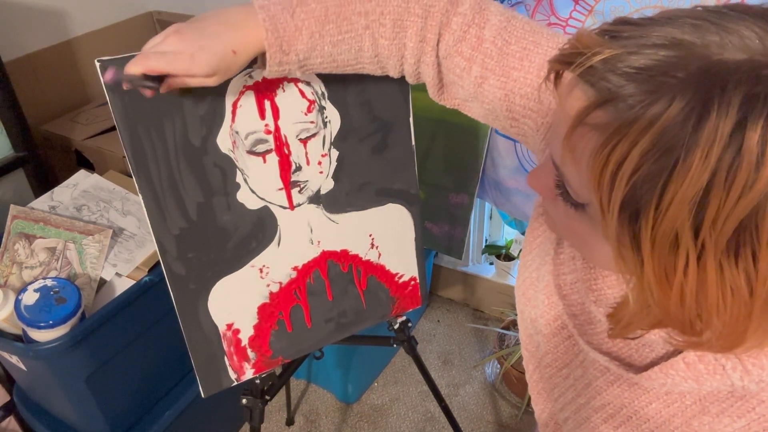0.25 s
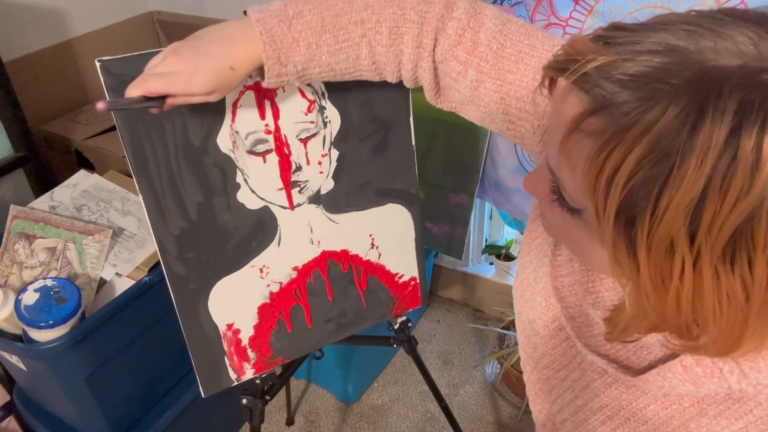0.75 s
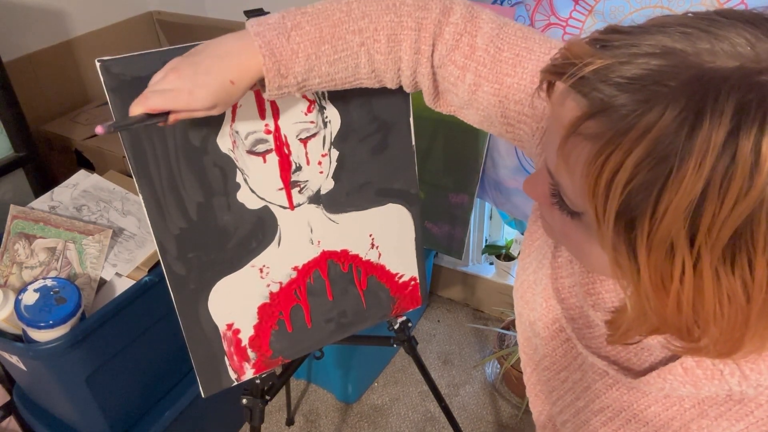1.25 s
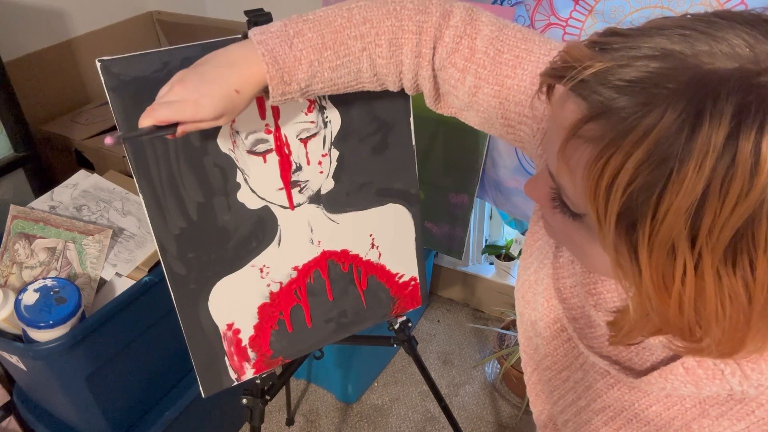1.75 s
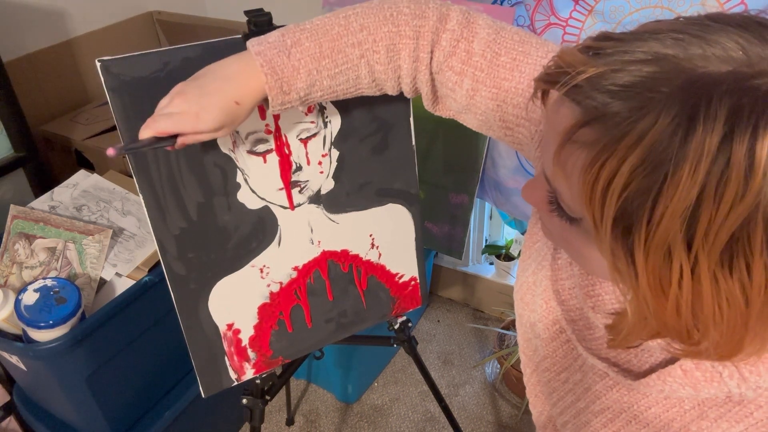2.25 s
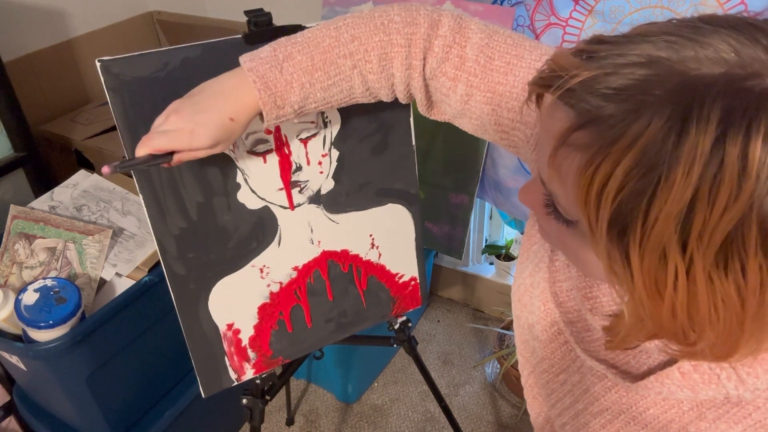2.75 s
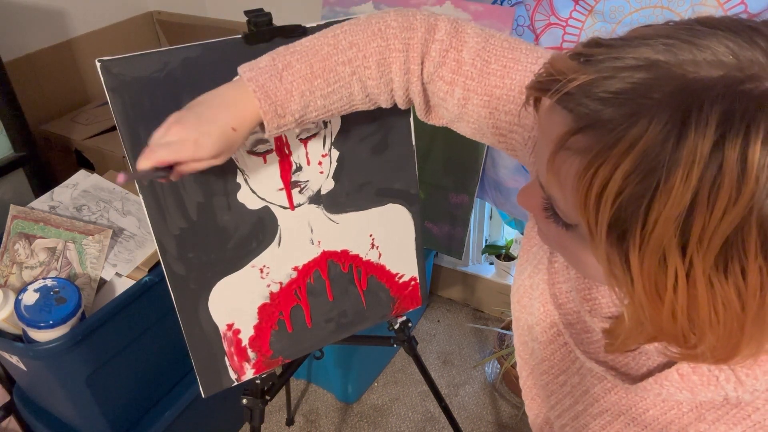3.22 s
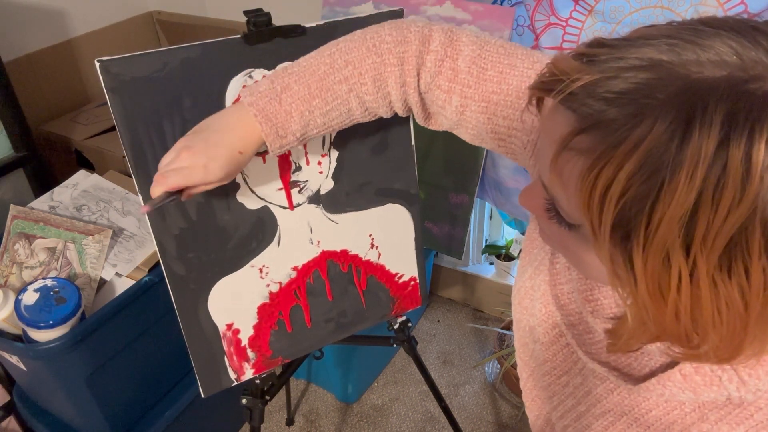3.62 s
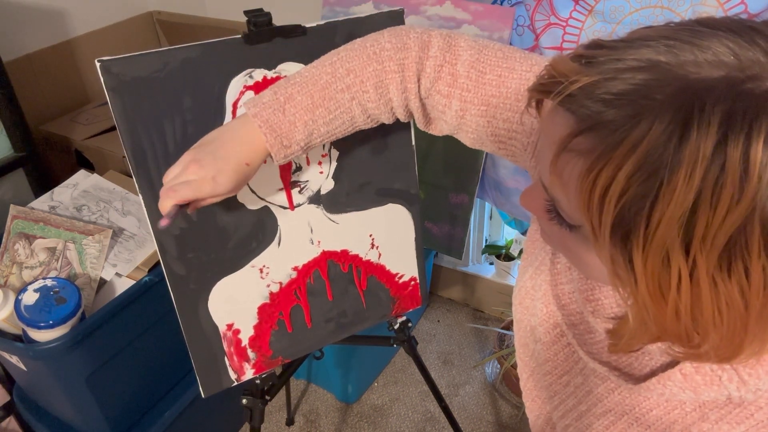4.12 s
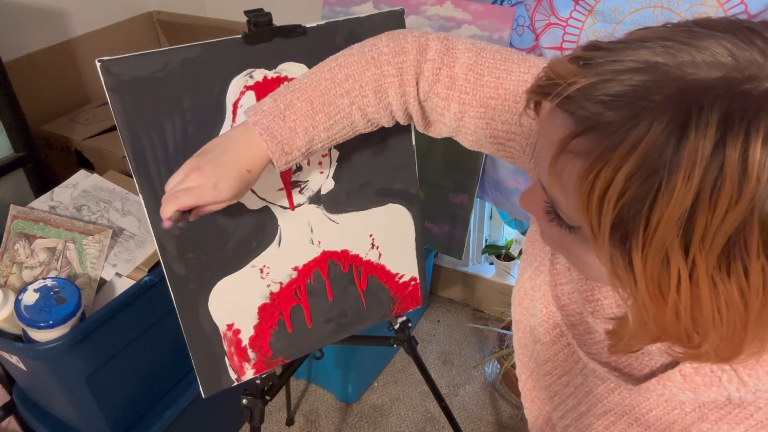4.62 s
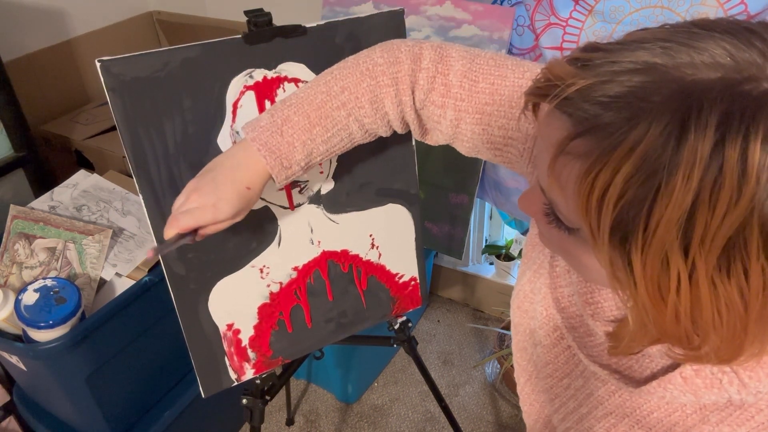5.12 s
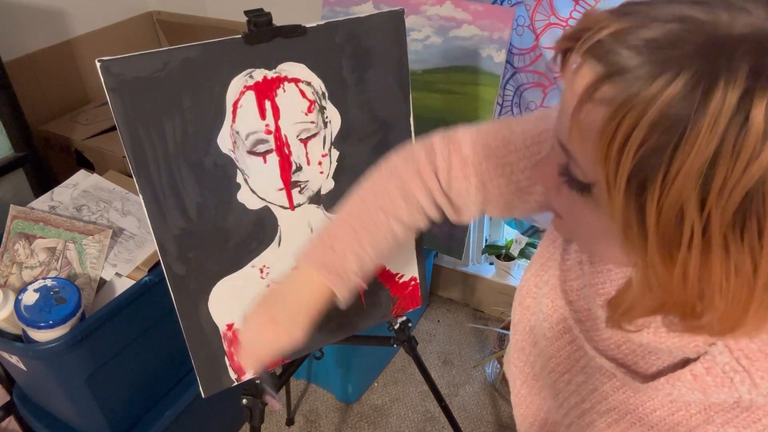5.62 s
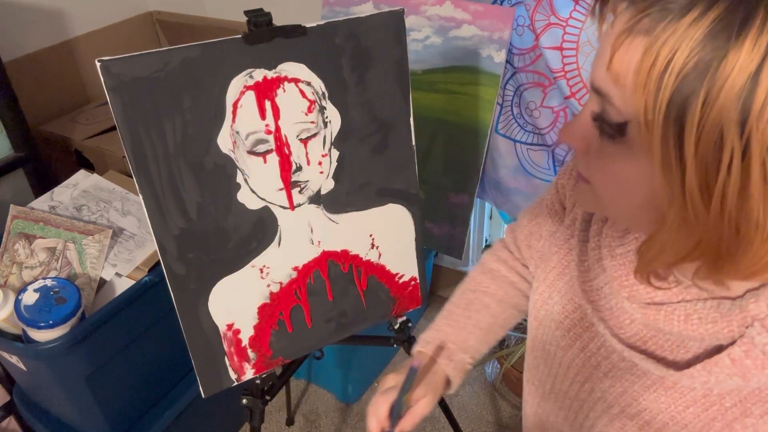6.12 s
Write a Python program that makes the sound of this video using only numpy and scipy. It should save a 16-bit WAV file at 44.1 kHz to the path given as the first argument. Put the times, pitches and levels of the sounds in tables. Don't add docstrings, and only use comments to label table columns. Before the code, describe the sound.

Close, quiet painting sounds: short bristly swishes and dull dabs on taut cloth, small wooden creaks, and a muffled engine slowing to idle beyond the wall.

```python
import sys
import numpy as np
from scipy import signal
from scipy.fft import rfft, irfft
from scipy.io import wavfile

SR = 44100
rng = np.random.default_rng(int(sys.argv[2]) if len(sys.argv) > 2 else 0)


def invert_db(x):
    u = np.asarray(x, float) / 20
    return 10 ** u


def bounce(signal):
    frames = np.transpose(np.atleast_2d(signal))
    limited = np.clip(frames, -1, 1)
    pcm = np.round(limited * 32767).astype(np.int16)
    wavfile.write(sys.argv[1], SR, pcm)


N = 280917

# centre [Hz], width [Hz], level [dB].
CLOTH_RESONANCES = [(1260, 196, 1), (1650, 223, 2.5), (2260, 840, -1.5), (3010, 82, 4), (3500, 670, -4.5),
                    (4530, 1400, -36.5)]
# centre [Hz], width [Hz], level [dB].
FRAME_RESONANCES = [(304.8, 28, 7), (345.2, 30, 6), (430, 28, -3.5), (523, 108, -3.5), (760, 230, -5),
                    (957, 250, -6.5)]
# centre [Hz], width [Hz], level [dB].
THUD_RESONANCES = [(169, 45, 1), (223.7, 17.1, 4.5), (391, 65, 0)]
# time [s], swell [dB], left minus right [dB].
TRAFFIC = [
    (0.0, -15.5, -2),
    (1.29, -4.5, -0.5),
    (1.88, -6, 1),
    (2.04, -9.5, 0.5),
    (4.17, 1.5, 1.5),
    (4.59, -4.5, -4),
    (4.77, -3.5, 1),
    (6.37, -7.5, -0.5),
]
PORT_LAG = 4.3
CANVAS_PAN_DB = -2.2
REFLECTED = 0.4


def brush():
    # frequency [Hz], spectrum level [dB per Hz].
    bristle_spectrum = [(900, -43), (1800, -16), (3000, -7.5), (3700, 1), (4800, 6), (5800, 4.5),
                        (8100, 4.5), (9500, 0), (10300, -9), (11500, -25.5), (14300, -9), (15600, -17),
                        (16000, -51), (20000, -70)]
    tuft_edges = [2600, 3400, 4400, 5600, 7000, 8600]
    firm_db, brightens = -65, 0.44
    dab_cut_hz = 5500
    hiss, *stroked = strokes()
    scuff, *dabbed = dabs()
    cloth, frame, thud = np.array(stroked) + dabbed
    bands = list(zip(tuft_edges, tuft_edges[1:]))
    tufts = [invert_db(1.6 * drift(5.2)) - 1 for _ in bands]
    angle = invert_db(2.0 * drift(8.1)) * (hiss / invert_db(firm_db) + 1e-9) ** brightens

    def voice(slips):
        bright = colour(slips, bristle_spectrum)
        dull = muffle(muffle(bright, dab_cut_hz), dab_cut_hz)
        for band, catch in zip(bands, tufts):
            sos = signal.butter(1, band, "band", fs=SR, output="sos")
            bright = bright + catch * signal.sosfiltfilt(sos, bright)
        treble = bright - muffle(bright, 5500)
        bright = bright + treble * (angle - 1)
        soft = muffle(slips, 1300)
        surface = hiss * bright + scuff * dull + cloth * body(slips, CLOTH_RESONANCES)
        return surface + frame * body(soft, FRAME_RESONANCES) + thud * body(soft, THUD_RESONANCES)

    near = voice(grains(6000, 2.56))
    apart = voice(grains(6000, 3.2))
    return ports(near, apart, REFLECTED, PORT_LAG, CANVAS_PAN_DB)


def strokes():
    # time of most pressure [s], bristle hiss [dB], rise [s], fall [s],
    # cloth drumming relative to the hiss [dB].
    stroke_rows = [(0.236, -63, 0.073, 0.071, -8), (0.786, -67, 0.078, 0.062, -5.5),
                   (1.337, -66, 0.061, 0.057, -6.5), (1.932, -65.5, 0.076, .055, -6),
                   (2.48, -66, 0.059, 0.093, -7), (3.015, -70.5, 0.11, 0.095, -8.5),
                   (3.072, -72, .04, 0.052, -4), (3.608, -67, 0.06, 0.091, -6),
                   (4.072, -65.5, 0.059, 0.077, -8), (4.552, -68.5, 0.082, 0.071, -9.5),
                   (4.972, -67, 0.068, 0.067, -9.5), (5.272, -76.5, 0.029, 0.066, -0.5),
                   (5.326, -68.5, 0.029, 0.083, -9), (6.34, -73.5, 0.067, 0.097, -7.5)]
    edge_db, shoulder = -15.5, 2.04
    push_db, push_follows = -8, 0.6
    t = np.arange(N) / SR
    hiss, cloth, frame = 0, 0, 0
    for s, peak_db, rise, fall, cloth_db in stroke_rows:
        away = np.where(t < s, (s - t) / rise, (t - s) / fall)
        swell_db = edge_db * np.minimum(away, 8) ** shoulder
        hiss = hiss + invert_db(peak_db + swell_db)
        cloth = cloth + invert_db(peak_db + cloth_db + swell_db)
        frame = frame + invert_db(peak_db + push_db + push_follows * swell_db)
    wavers = [(1.0, 45), (1.5, 13), (2.5, 30), (3.0, 19)]
    waver = [invert_db(swing_db * drift(rate)) for swing_db, rate in wavers]
    return hiss * waver[0], cloth * waver[1], frame * waver[2], frame * waver[3]


def dabs():
    # start [s], peak [dB], upper part relative [dB], thud relative [dB], length [s].
    dab_rows = [(0.059, -71, -4, -9, 0.016), (0.582, -64, -13, -5, 0.021), (1.205, -79, -6, 4, 0.059),
                (1.633, -72.5, -4, -19, 0.031), (1.658, -73.5, -11, 6, 0.031),
                (2.177, -80.5, -1, -6, 0.044), (2.252, -68, -11.5, -10, 0.043), (2.72, -60, -5, -16, 0.016),
                (2.732, -58.5, -13, -12, 0.0075), (2.744, -67, -5, -3, 0.029),
                (2.767, -68.5, -17, 3, 0.023), (3.256, -85, -15, -5, 0.018), (3.911, -58, -9, -11, 0.013),
                (4.392, -79, 1.5, -13, 0.022), (4.835, -71.5, -11, 6.5, 0.017),
                (5.058, -81.5, 3.5, 11, 0.013), (5.098, -79, -1, 19.5, 0.0091), (5.201, -71, -9, -3, 0.018),
                (5.232, -68, -13, 9, 0.01), (4.688, -76, -23, 3, 0.0064), (6.315, -60.5, -35, 6.5, 0.014),
                (6.333, -56, -19, -0.5, 0.031)]
    t = np.arange(N) / SR
    low, high, deep = np.zeros((3, N))
    for s, peak_db, upper_db, thud_db, length in dab_rows:
        age = np.clip((t - s) / max(length, 0.003), 0, 40)
        shape = invert_db(peak_db - 1) * np.minimum(age * 7.1, 1) * np.exp(-age ** 1.2)
        low += shape
        high += invert_db(upper_db) * shape
        deep += invert_db(thud_db) * shape
    return invert_db(-7.5) * high, high, low, deep


def singing():
    # centre [s], length [s], frequency [Hz], level [dB].
    patches = [(0.234, 0.038, 557, -73.5), (0.237, 0.036, 5100, -69), (2.515, 0.004, 795, -71),
               (3.008, 0.032, 1140, -86), (3.069, 0.0077, 1650, -73), (3.611, 0.033, 1650, -78),
               (4.116, 0.015, 1140, -79), (4.499, 0.024, 1054, -79), (5.065, 0.0073, 1960, -81),
               (5.237, 0.0082, 1410, -85), (5.295, 0.014, 2050, -80), (5.613, 0.017, 1580, -87),
               (5.652, 0.027, 1060, -87), (5.863, 0.028, 1590, -85), (5.865, 0.027, 1095, -87.5),
               (6.011, 0.014, 1080, -86)]
    out = np.zeros((2, N))
    t = np.arange(-4000, 4000) / SR
    for s, length, hz, level_db in patches:
        band = signal.butter(2, [hz * 0.95, hz * 1.05], "band", fs=SR, output="sos")
        noise = rms_one(signal.sosfilt(band, rng.standard_normal((2, len(t)))))
        at = round(s * SR) - len(t) // 2
        swell = np.exp(-0.5 * (t / length) ** 2)
        out[:, at:at + len(t)] += invert_db(level_db) * swell * noise
    return ports(*out, REFLECTED, PORT_LAG, CANVAS_PAN_DB)


def easel():
    # time of slip [s], peak [dB], frequency [Hz].
    slips = [(3.749, -72, 875), (3.797, -72, 918), (3.831, -73, 1130), (3.865, -68.5, 897),
             (3.884, -71, 960), (3.9, -62.5, 870), (3.926, -64, 840), (3.934, -76, 1010), (3.953, -67, 865),
             (3.971, -65, 830), (4.025, -71, 860), (5.334, -65, 820), (5.351, -63.5, 970),
             (5.367, -63, 850), (5.385, -72, 885)]
    out = np.zeros(N)
    t = np.arange(int(0.03 * SR)) / SR
    shape = np.minimum(t / 0.0027, 1) * np.exp(-t / 0.0032)
    for s, peak_db, hz in slips:
        at = round(s * SR)
        out[at:at + len(t)] += invert_db(peak_db + 9.0) * shape * np.sin(2 * np.pi * hz * t)
    return ports(out, np.roll(out, 30), 0.2, PORT_LAG, pan_db=0)


def sleeve():
    # centre [s], length [s], level [dB], upper part relative [dB],
    # weight on the floor relative [dB].
    shifts = [(0.03, 0.067, -69, -18, 3), (0.23, 0.053, -72, -15, 9), (0.672, 0.065, -70.5, -6, 7.5),
              (1.256, 0.087, -74, -7.5, 13), (1.88, 0.084, -76, -2, -1), (2.44, 0.048, -67.5, -8, 5),
              (2.62, 0.033, -67.5, -24, -6), (2.73, 0.0071, -70.5, 15.5, -14), (3.05, 0.032, -62, -17, 4.5),
              (3.263, 0.048, -68, -30, 11), (3.594, .08, -70, -12, 2), (3.935, 0.03, -75.5, 1.5, 17),
              (4.29, 0.22, -74, -18, 8), (5.258, 0.16, -72.5, -21, -11), (5.665, 0.052, -61, -18, -8),
              (6.348, 0.018, -54, -14, -13), (5.918, 0.08, -70.5, -11, 1.5), (6.13, 0.04, -66, -23, -7)]
    t = np.arange(N) / SR
    low, upper, deep = invert_db(-80), invert_db(-97), invert_db(-77.5 + 2 * drift(3))
    for s, length, level_db, upper_db, weight_db in shifts:
        swell = invert_db(level_db) * np.exp(-0.5 * ((t - s) / length) ** 2)
        low = low + swell
        upper = upper + invert_db(upper_db) * swell
        deep = deep + invert_db(weight_db) * swell

    def voice():
        slips = muffle(grains(3000, 2.5), 1800) * invert_db(1.5 * drift(6))
        rub = low * body(slips, FRAME_RESONANCES[:4])
        rub = rub + invert_db(-6) * upper * body(slips, FRAME_RESONANCES[4:] + CLOTH_RESONANCES[:2])
        return invert_db(-6) * (rub + deep * body(slips, THUD_RESONANCES[:2]))

    return ports(voice(), voice(), 0.6, 0, pan_db=-3)


def engine():
    # time [s], cycles per second [Hz].
    speed = [(0.0, 11.26), (0.4, 11.55), (1.0, 11.85), (1.1, 11.76), (1.2, 11.24), (1.6, 9.2), (1.8, 8.5),
             (2.0, 8.3), (2.6, 8.4), (3.2, 8.04), (3.8, 6.83), (4.1, 6.9), (4.4, 7.18), (5.0, 7.0),
             (5.3, 6.83), (5.6, 7.13), (6.0, 6.91), (6.37, 6.83)]
    # time [s], load [dB], knock of the highest strong order [dB].
    load = [(0.0, -47, 0.5), (0.4, -44, 1.1), (1.0, -44, -1), (1.3, -50.5, 7.5), (1.55, -54.5, 3.5),
            (2.2, -53.5, -7), (2.8, -56.5, -1.5), (3.2, -52.5, -3), (3.5, -56.5, 5), (3.8, -54.5, -16.5),
            (4.1, -52, -4.5), (4.5, -56, 1.5), (5.0, -58, -15.5), (5.2, -56, 2), (5.6, -60, 2.6),
            (5.9, -64, 10.5), (6.2, -59, 12), (6.37, -59.5, 9.5)]
    strong_orders = [5, 8, 11, 16]
    strong_levels = [0.2, 0.15, -2, 0.7]
    weak_orders = [4, 6, 7, 9, 10, 12, 13, 14, 15, 18]
    weak_levels = [-8, -9.5, -1.5, 5.5, 3.5, -12.5, -11, -2, -7.5, -16]
    # frequency [Hz], level [dB].
    wall = [(28, -13.5), (45, -12), (65, -2.5), (105, -8), (150, -4.5), (240, -4)]
    idle_db, weak_under_db, weak_follows = -60, -68, 0.55
    per_s, = in_time(speed)
    load_db, knock_db = in_time(load)
    turn = 2 * np.pi * np.cumsum(per_s) / SR
    strong = [load_db + db + boom_db(k * per_s) for k, db in zip(strong_orders, strong_levels)]
    strong[-1] = strong[-1] + knock_db
    weak_db = weak_under_db + weak_follows * (load_db - idle_db)
    weak = [weak_db + db + at_hz(wall, k * per_s) + 2.0 * drift(7.1)
            for k, db in zip(weak_orders, weak_levels)]
    rattle_db = -66 - 40 * np.maximum(np.arange(N) / SR - 0.3, 0)
    out = 0
    for order, level_db in zip(strong_orders + weak_orders + [20], strong + weak + [rattle_db]):
        skew = np.array([[0.5], [-0.5]]) * 0.003 * order * per_s * rng.choice([-1, 1])
        phase = order * turn + rng.uniform(0, 2 * np.pi) + skew
        out = out + np.sqrt(2) * invert_db(level_db + 0.29 * drift(2)) * np.sin(phase)
    return out * invert_db(in_time(TRAFFIC)[1] * [[0.5], [-0.5]])


def boom_db(hz):
    # centre [Hz], width [Hz], level [dB].
    booms = [(57.2, 21, 0), (74.3, 4.1, 1), (116.25, 14, -1.5), (183, 21, -13.5)]
    power = 0
    for centre, width, db in booms:
        power = power + invert_db(2 * db) / (1 + (2 * (hz - centre) / width) ** 2) ** 2
    return 10 * np.log10(power)


def mains():
    # frequency [Hz], level [dB rms].
    hums = [(120, -64)]
    t = np.arange(N) / SR
    out = 0
    for hz, db in hums:
        phase = 2 * np.pi * hz * t + 0.25 * drift(3.6)
        out = out + np.sqrt(2) * invert_db(db + 1.1 * drift(9)) * np.sin(phase)
    return out


def room_modes():
    # centre [Hz], width [Hz], level [dB].
    air_modes = [(219, 21, -4), (298.8, 8.4, 6), (351, 12, -1), (442, 29, -6)]
    noise = muffle(rng.standard_normal(N), 500)
    ring = body(noise, air_modes) * invert_db(-78 + 2 * drift(3.4))
    return ports(ring, ring[::-1], 0.35, 0, pan_db=-2.5)


def room():
    # frequency [Hz], spectrum level [dB per Hz].
    room_spectrum = [(15, -21), (25, -8), (43, -2.5), (71, -1), (128, -2.5), (200, -13.5), (260, -25.5),
                     (330, -30.5), (590, -36), (1400, -44.5), (7100, -52), (9500, -53.5), (10700, -63.5),
                     (12600, -65), (13600, -77)]
    # frequency [Hz], left-right likeness [0 to 1].
    likeness = [(60, 1), (130, 0.68), (260, 0.49), (540, 0.074), (1130, 0.14), (2400, 0.091), (9300, 0.03),
                (10000, 0.8)]
    hz = np.maximum(np.fft.rfftfreq(N, 1 / SR), 1)
    alike = np.clip(at_hz(likeness, hz), -1, 1)
    mid, side = rfft(rng.standard_normal((2, N)))
    both = np.sqrt(1 + alike) * mid + np.sqrt(1 - alike) * side * [[1], [-1]]
    both = both * invert_db(at_hz(room_spectrum, hz))
    bass = 1 / (1 + (hz / 170) ** 4)
    treble = 1 / (1 + (700 / hz) ** 4)
    swell = invert_db(in_time(TRAFFIC)[0])
    gusts = invert_db(2.7 * drift(3))
    scale = invert_db(-56.5) / np.std(irfft(both, N))
    moving = irfft(both * bass, N) * swell + irfft(both * (1 - bass - treble), N) * gusts
    return scale * (moving + irfft(both * treble, N))


def grains(per_s, spread_db):
    sizes = invert_db(spread_db * np.minimum(rng.exponential(1, N), 4)) * rng.choice([-1, 1], N)
    return sizes * (rng.random(N) < per_s / SR)


def body(x, resonances):
    out = 0
    for k, (hz, width, level_db) in enumerate(resonances):
        r = np.exp(-np.pi * width / SR)
        top = [(1 - r * r) / 2, 0, (r * r - 1) / 2]
        ring = signal.lfilter(top, [1, -2 * r * np.cos(2 * np.pi * hz / SR), r * r], x)
        out = out + (-1) ** k * invert_db(level_db + 1.6 * drift(10.0)) * ring
    return rms_one(out)


def muffle(x, cut_hz):
    return signal.sosfilt(signal.butter(2, cut_hz, fs=SR, output="sos"), x)


def colour(x, spectrum):
    hz = np.maximum(np.fft.rfftfreq(N, 1 / SR), 1)
    return rms_one(irfft(rfft(x) * invert_db(at_hz(spectrum, hz)), N))


def ports(near, apart, share, lag, pan_db):
    hz = np.fft.rfftfreq(N, 1 / SR)
    dull = 1 / (1 + (hz / 7000) ** 2)
    share = np.clip(share, 0, 1) * dull
    direct = rfft(near) * np.exp(-2j * np.pi * hz * np.array([[0], [lag]]) / SR)
    scattered = rfft(np.array([apart, np.pad(apart, (211, 0))[:N]]))
    both = np.sqrt(1 - share) * direct + np.sqrt(share) * scattered
    return irfft(both * invert_db(dull * [[pan_db / 2], [-pan_db / 2]]), N)


def drift(rate):
    r = np.exp(-80 * np.pi * rate / SR)
    noise = rng.standard_normal(N // 40 + 2002)
    slow = signal.lfilter([1], [1, -2 * r, r * r], noise)[2000:]
    return np.interp(np.arange(N) / 40, np.arange(len(slow)), rms_one(slow))


def rms_one(x):
    return x / np.sqrt(np.mean(x ** 2) + 1e-20)


def in_time(rows):
    s, *columns = np.transpose(rows)
    return [np.interp(np.arange(N) / SR, s, column) for column in columns]


def at_hz(points, hz):
    centres, values = np.transpose(points)
    return np.interp(np.log(hz), np.log(centres), values)


def scene():
    close = brush() + singing() + easel() + sleeve()
    return close + engine() + mains() + room_modes() + room()


def band_limit(x):
    return signal.sosfilt(signal.butter(12, 15750, fs=SR, output="sos"), x)


def record(dry):
    settle = 1 - 0.23 * np.exp(-np.arange(N) / SR / 0.0031)
    return band_limit(dry * settle)


dry = scene()
out = record(dry)
bounce(out)
```